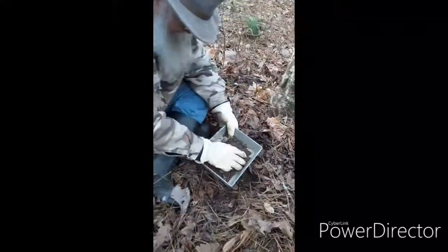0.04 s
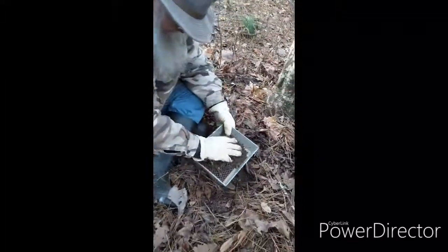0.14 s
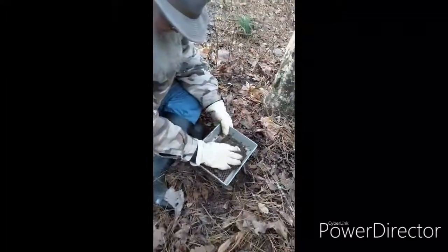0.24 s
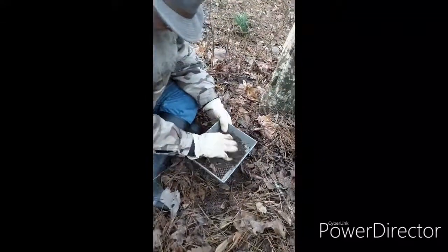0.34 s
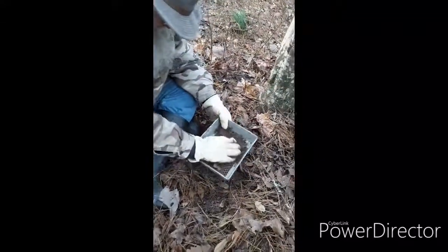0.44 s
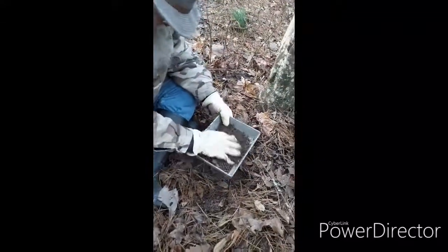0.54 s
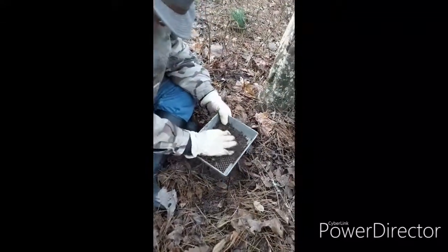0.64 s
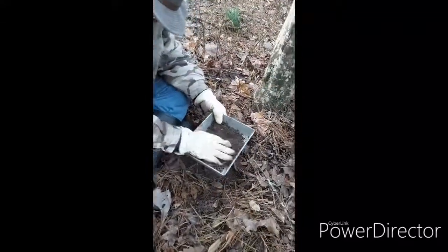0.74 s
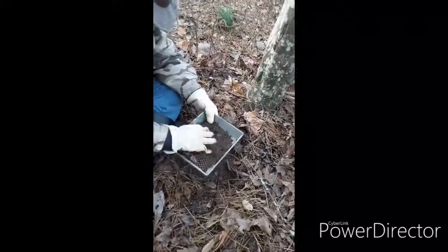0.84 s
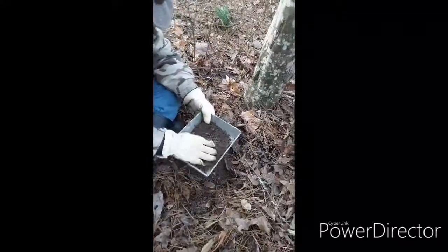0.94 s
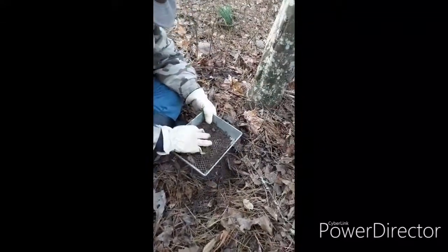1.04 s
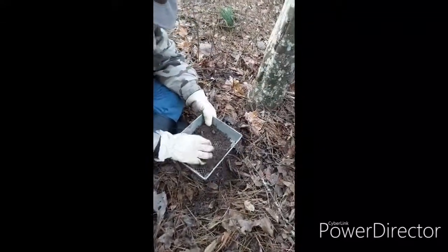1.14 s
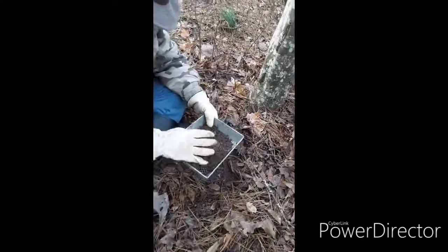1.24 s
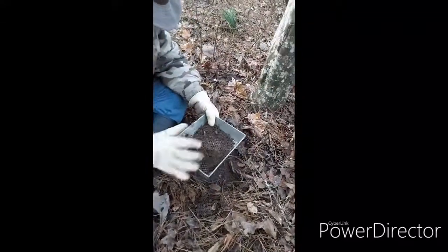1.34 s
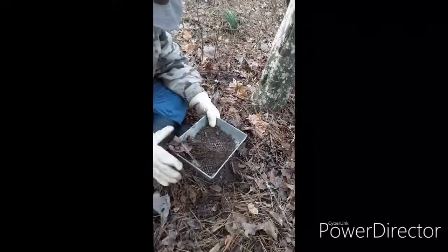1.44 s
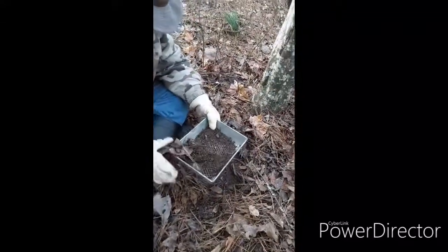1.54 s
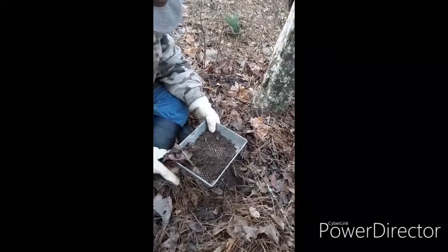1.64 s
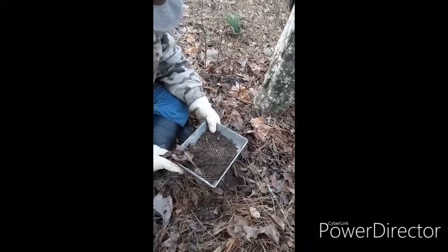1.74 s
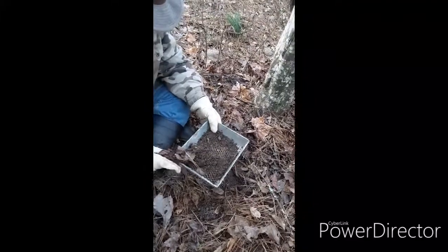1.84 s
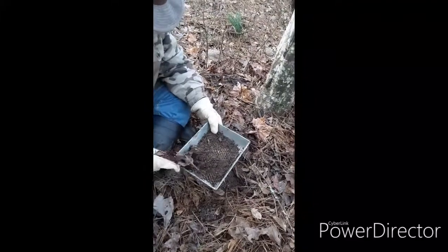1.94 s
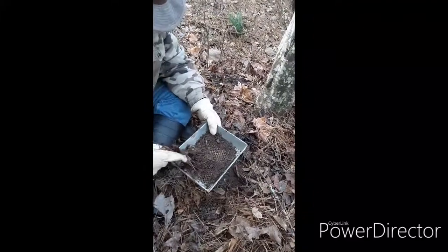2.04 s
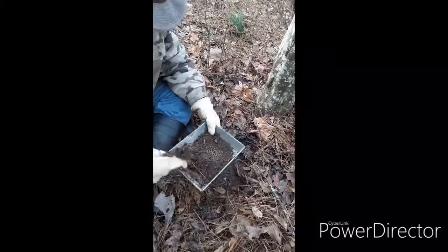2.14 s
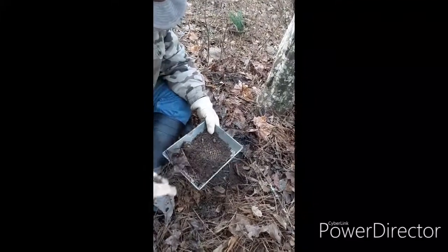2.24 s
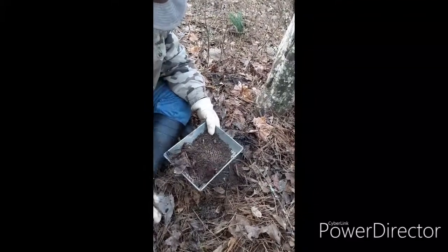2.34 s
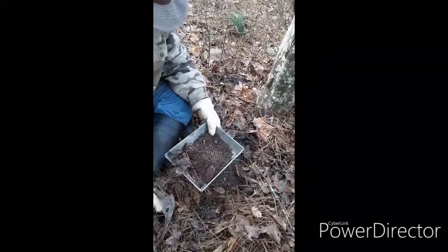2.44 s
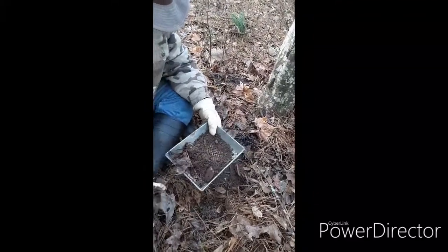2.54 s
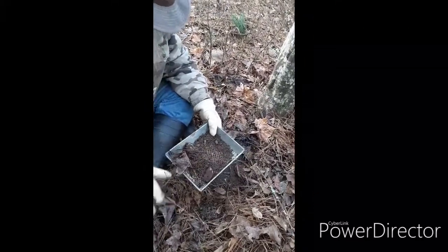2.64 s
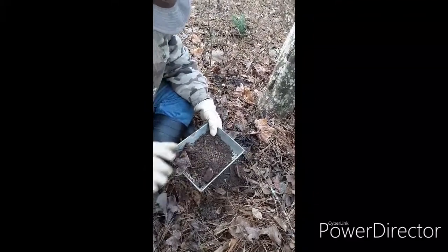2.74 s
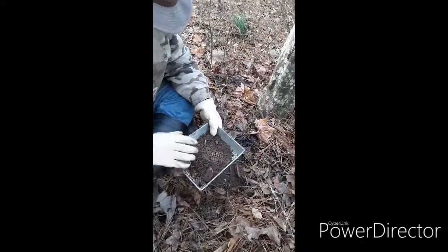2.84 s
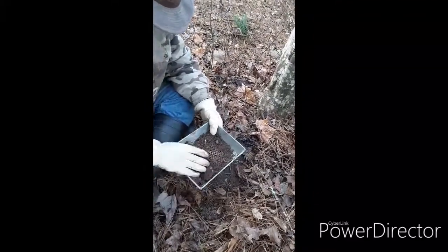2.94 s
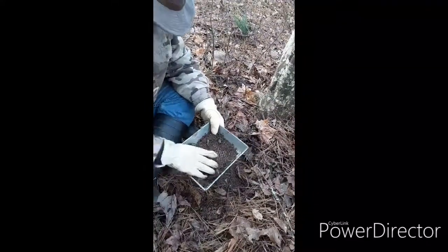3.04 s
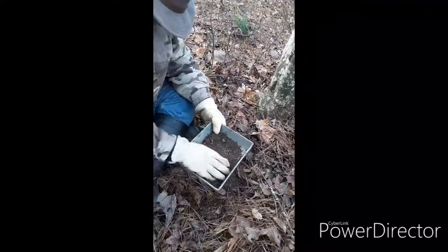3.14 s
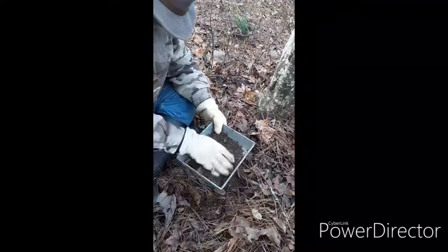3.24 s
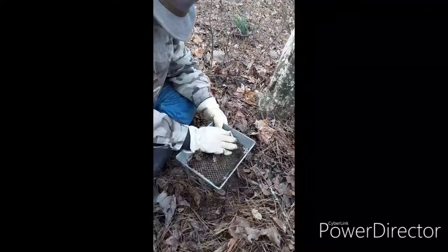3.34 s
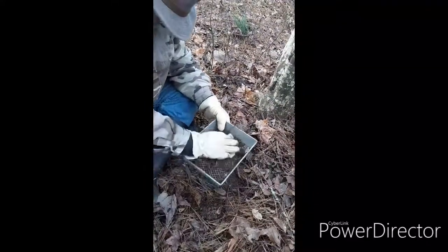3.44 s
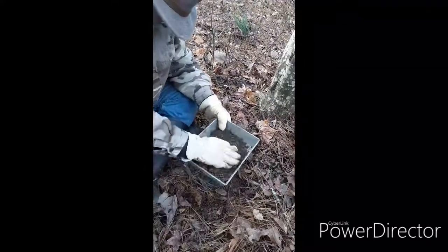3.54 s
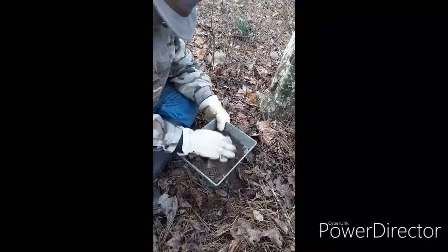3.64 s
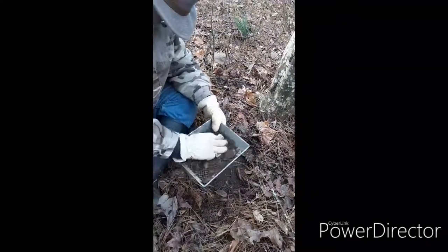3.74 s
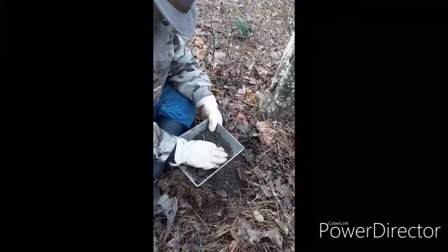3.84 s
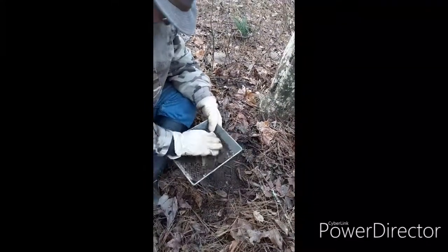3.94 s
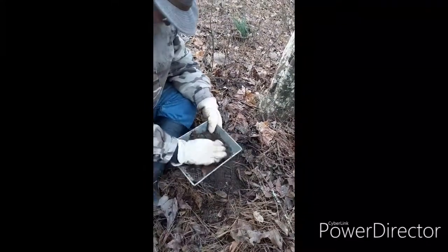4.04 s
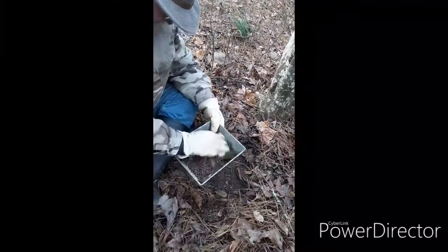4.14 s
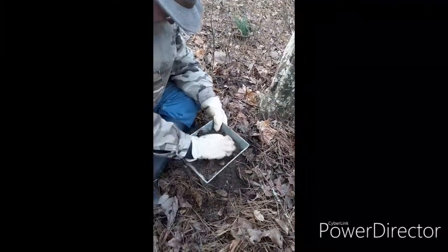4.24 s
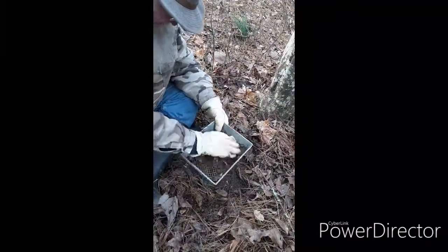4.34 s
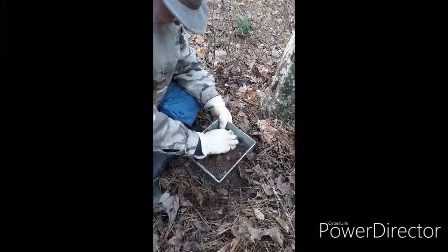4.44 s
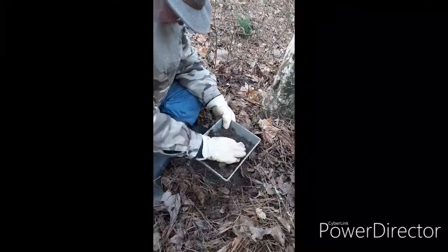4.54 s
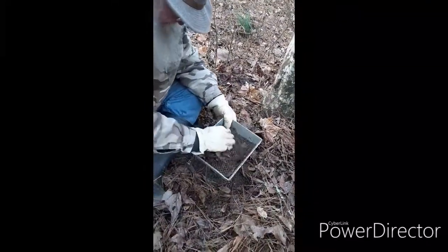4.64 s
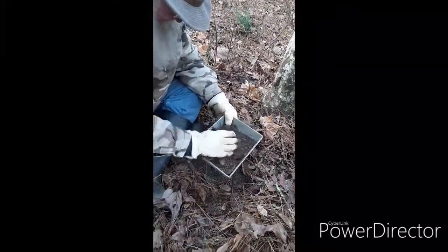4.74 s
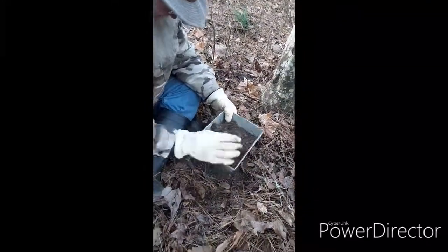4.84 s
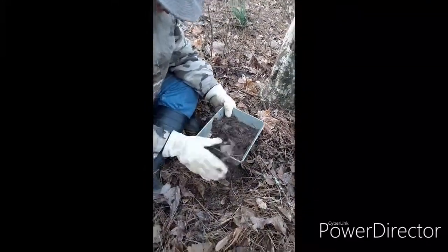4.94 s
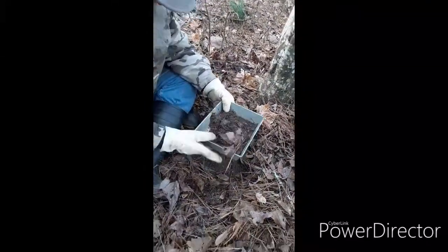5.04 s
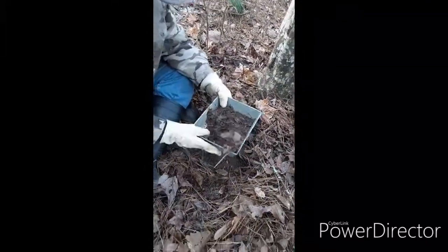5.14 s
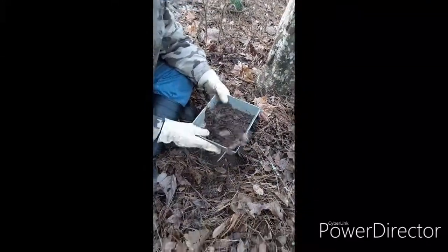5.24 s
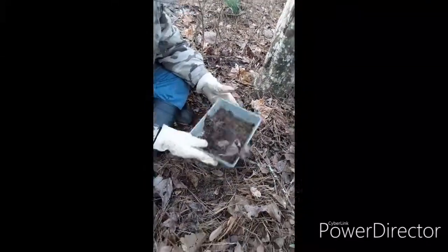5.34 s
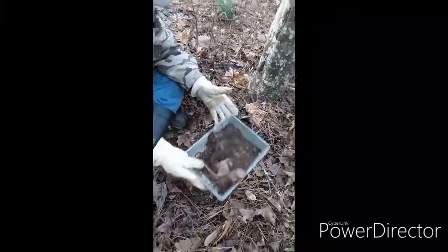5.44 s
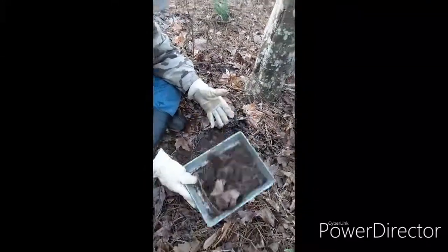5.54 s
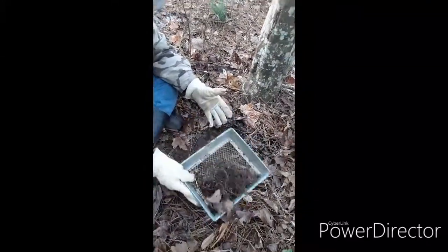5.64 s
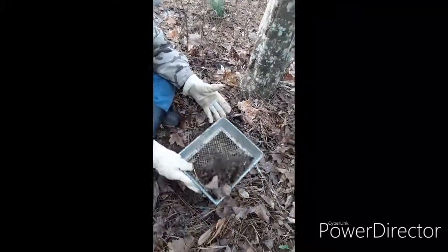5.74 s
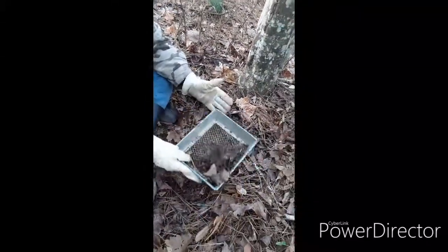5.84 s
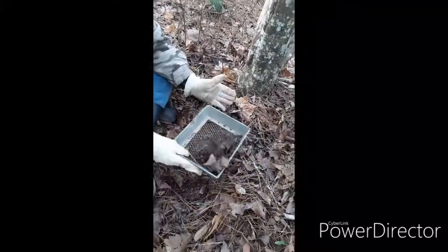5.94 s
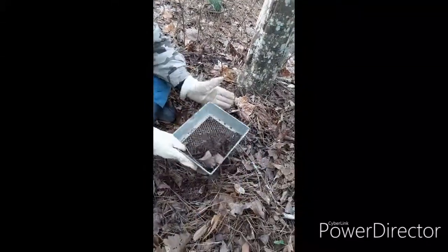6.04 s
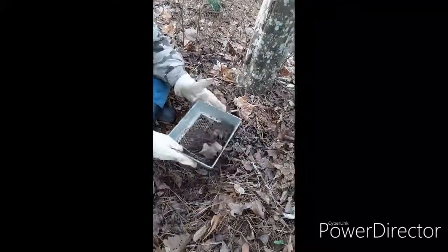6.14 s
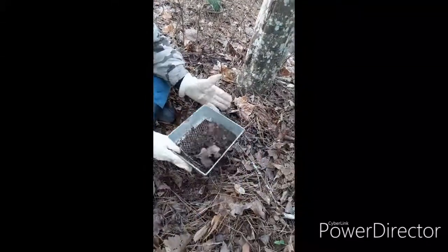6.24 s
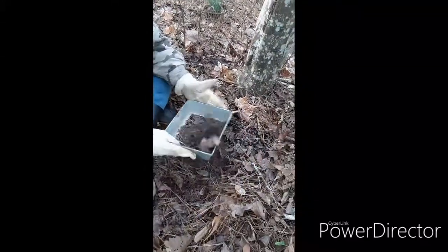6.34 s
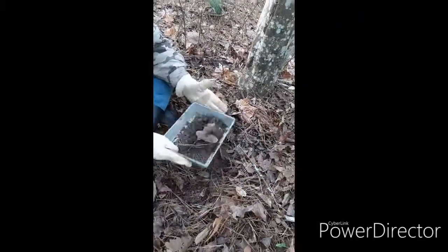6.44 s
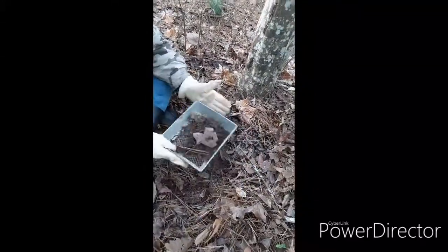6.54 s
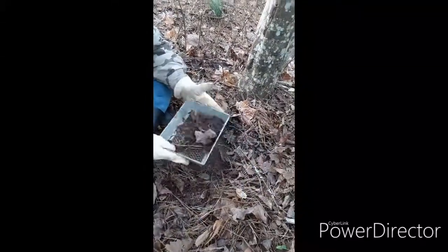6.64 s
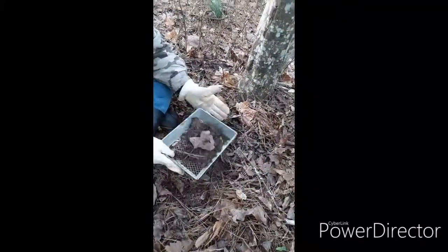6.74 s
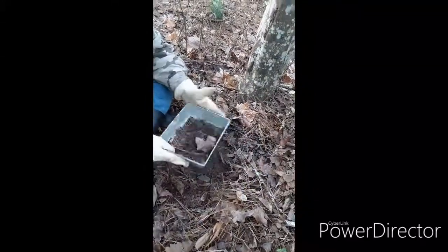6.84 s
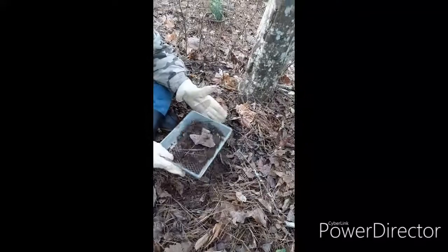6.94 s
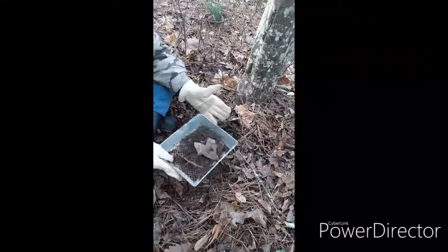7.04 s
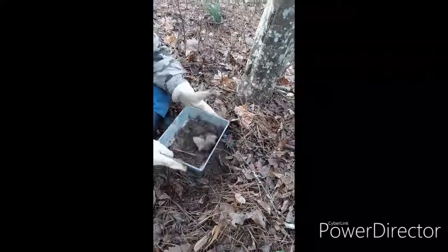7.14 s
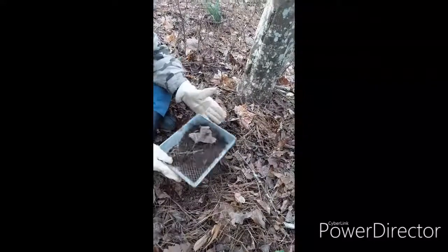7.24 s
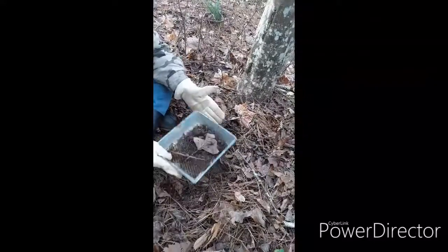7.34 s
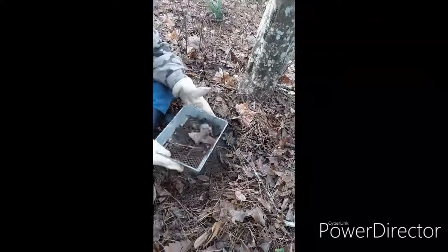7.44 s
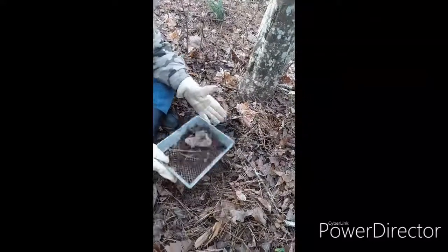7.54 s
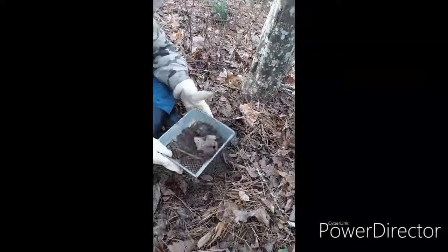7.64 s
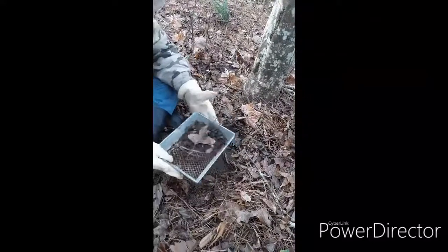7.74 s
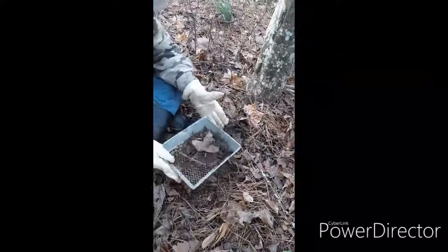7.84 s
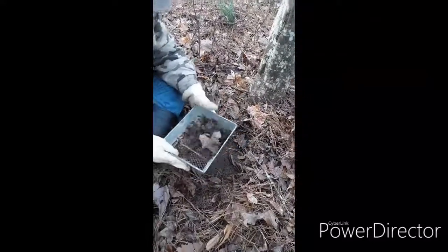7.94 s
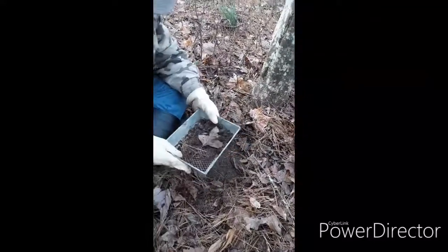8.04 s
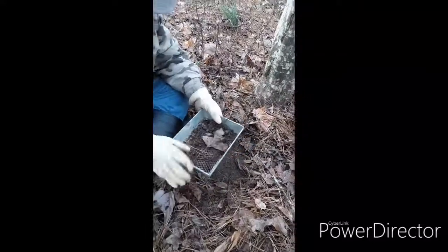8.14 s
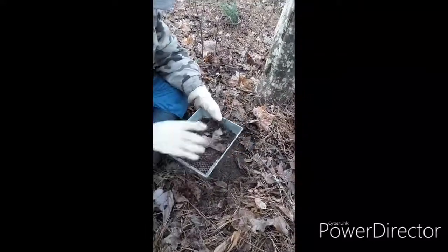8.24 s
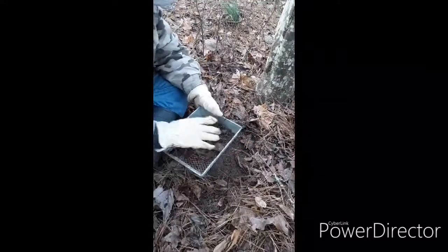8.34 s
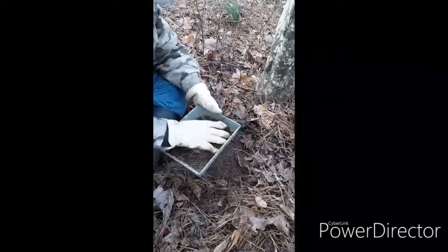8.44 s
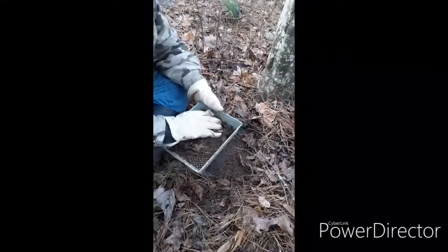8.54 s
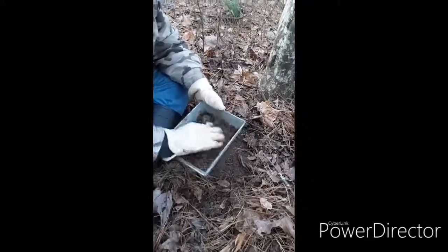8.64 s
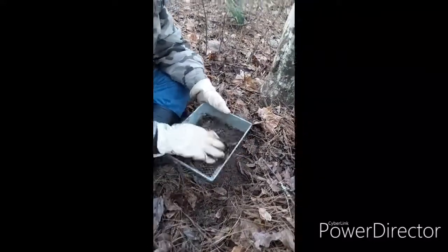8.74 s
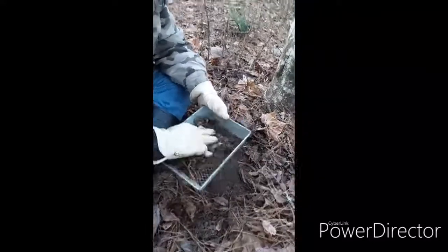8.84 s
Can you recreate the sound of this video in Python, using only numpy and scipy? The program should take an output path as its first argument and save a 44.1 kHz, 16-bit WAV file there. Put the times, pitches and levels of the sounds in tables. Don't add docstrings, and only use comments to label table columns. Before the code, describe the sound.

Fine grit hisses and patters onto dry leaves, with clods bumping wire, before a run of seven hard wooden knocks with rattling dirt.

```python
import sys
import numpy as np
from scipy import signal
from scipy.fft import rfft, irfft, next_fast_len
from scipy.io import wavfile
from scipy.ndimage import uniform_filter1d, map_coordinates

SR = 44100
rng = np.random.default_rng(int(sys.argv[2]) if len(sys.argv) > 2 else 0)


def rack_gain(trim_db):
    fader = np.asarray(trim_db, float)
    return 10 ** (fader / 20)


def master(y):
    cut = np.clip(np.atleast_2d(y).T, -1, 1)
    pcm = np.round(cut * 32767)
    wavfile.write(sys.argv[1], SR, pcm.astype(np.int16))


N = 391916
CONTROL_S = np.arange(0, N, 44) / SR


def unit(x):
    return x / np.sqrt(np.mean(x ** 2) + 1e-20)


def along(points, hz):
    f, v = np.transpose(points)
    return np.interp(np.log(hz + 1), np.log(f + 1), v)


def filtered(x, response):
    n = x.shape[-1]
    m = next_fast_len(n + 4096)
    return irfft(rfft(x, m) * response(np.fft.rfftfreq(m, 1 / SR)), m)[..., :n]


def coloured(x, spectrum):
    return unit(filtered(x, lambda hz: rack_gain(along(spectrum, hz))))


def noise(t):
    return rng.standard_normal((2, len(t)))


def add(track, s, sound):
    part = track[..., max(round(s * SR), 0):][..., :sound.shape[-1]]
    part += sound[..., :part.shape[-1]]


def ringing(hz, t60, t):
    phase = rng.normal(0, hz / 5000 + 0.15, (2, 1))
    return rack_gain(-60 * t / t60) * np.sin(2 * np.pi * hz * t + phase)


# pitch_hz, density_db
HUSH_SPECTRUM = [(18, -30), (30, 4.5), (90, 9), (239, -11), (540, -1), (702, -1.5), (866, 2.5),
                 (1500, -0.5), (3670, -6.5), (4780, -30.5), (6550, -13), (8520, -18), (14400, -39),
                 (16000, -10.5)]
# pitch_hz, likeness (1 the same, 0 unrelated, -1 or less opposed)
PORT_LIKENESS = [(60, 0.95), (180, 0.72), (550, 0.68), (1650, -0.84), (4970, 1), (15000, -1.8)]


def hush():
    def split(hz):
        angle = np.arccos(np.clip(along(PORT_LIKENESS, hz), -1, 1)) / 2
        return rack_gain(along(HUSH_SPECTRUM, hz)) * [np.cos(angle), np.sin(angle)]

    mid, side = filtered(rng.standard_normal((2, N)), split)
    return rack_gain(-47.5 - 3.0) * unit(np.array([mid + side, mid - side]))


# time_s, flow_db, coarseness_db
TRICKLE_FLOW = [(0, -51, -4.5), (.25, -53, 1), (.45, -48.5, -1.5), (1.11, -48, -2.5), (1.17, -55, 4.5),
                (1.65, -58, -1.5), (1.75, -54, -1), (2.1, -59.5, 4), (2.65, -58.5, 1.5), (3.1, -57, 2),
                (4.75, -49.5, -5), (4.9, -55, 0), (5.2, -54, 1.5), (5.45, -57.5, 5), (5.75, -48, -5.5),
                (6.15, -55.5, -0.5), (7.6, -53, -4.5), (8.35, -59, 0)]


def trickle():
    s, flow_db, coarse_db = np.transpose(TRICKLE_FLOW)
    return np.array([rack_gain(2 * np.interp(CONTROL_S, s, db)) for db in (flow_db, flow_db + coarse_db)])


def swell(s, db, length_s):
    rise_share, edge_db = 0.62, 13
    late = CONTROL_S - s
    side_s = length_s * np.where(late < 0, rise_share, 1 - rise_share)
    return rack_gain(2 * (db - edge_db * np.abs(late / side_s) ** 1.73))


# time_s, weight_db
RESTING_LOAD = [(0, -60), (3.2, -69), (3.5, -60), (6.1, -59), (6.6, -64), (7.5, -64), (8.9, -57)]
# crest_s, weight_db
HAND_PRESSES = [(.05, -67), (.67, -58), (1.11, -53), (2.32, -60), (2.83, -60), (3.26, -64), (3.35, -53),
                (3.399, -43.5), (3.42, -50), (3.755, -48), (4.01, -56), (4.25, -66), (4.51, -57),
                (5.06, -55), (5.7, -67), (7.74, -60), (7.99, -46), (8.59, -52), (8.78, -44), (8.87, -43)]


def pressure():
    resting = rack_gain(2 * np.interp(CONTROL_S, *np.transpose(RESTING_LOAD)))
    return resting + sum(swell(s, db, 0.071) for s, db in HAND_PRESSES)


# crest_s, flow_db, length_s, coarseness_db
GLOVE_RUBS = [(0.06, -59, 0.072, 10.5), (0.192, -51.5, 0.092, 1), (0.486, -62, .08, 7),
              (.58, -47.5, 0.041, -15), (0.672, -48.5, .07, -6), (0.885, -48.5, 0.11, 3.5),
              (1.026, -47.5, .05, 0), (1.11, -47, 0.044, 4), (1.22, -52, 0.083, -3),
              (3.37, -38.5, 0.077, -7), (3.411, -44, 0.095, 3), (3.578, -43.5, 0.19, -5.5),
              (3.733, -45, 0.051, -2), (3.769, -43.5, 0.073, -0.5), (3.894, -41.5, 0.1, -5),
              (4.026, -50, 0.14, 0), (4.1, -48.5, 0.35, -2), (4.239, -40.5, 0.078, -4),
              (4.351, -42, 0.076, -9), (4.46, -42.5, 0.087, -2.5), (4.608, -40, 0.091, -7),
              (4.719, -42, 0.15, -2.5), (5.708, -46, 0.17, -6.5), (5.946, -45, 0.06, -9),
              (8.02, -59, 0.066, 13), (8.032, -47.5, 0.3, 2.5), (8.5, -51, 0.1, 2.5),
              (8.6, -40.5, 0.11, -3.5), (8.735, -43, 0.18, -4.5), (8.771, -39, 0.12, -9),
              (8.884, -36.5, 0.16, -3.5)]


def rubs():
    return sum(np.outer([1, rack_gain(2 * coarse_db)], swell(s, db, length_s))
               for s, db, length_s, coarse_db in GLOVE_RUBS)


# crest_s, flow_db, length_s
LEAF_BRUSHES = [(1.525, -51, 0.029), (1.716, -48.5, 0.05), (2.221, -47.5, 0.057), (2.567, -50.5, 0.035),
                (2.72, -50.5, 0.047), (2.834, -52.5, .1), (2.889, -51, 0.044), (3.022, -48, 0.044),
                (3.036, -49, 0.11), (3.184, -49.5, 0.11), (3.275, -51.5, 0.13), (5.015, -49, 0.074)]


def brushes():
    coarse_db = -14
    return sum(np.outer([1, rack_gain(2 * coarse_db)], swell(*brush)) for brush in LEAF_BRUSHES)


# blow_s, slide_before_db, rattle_after_db
LOAD_SHAKES = [
    (6.185, -70, -46.5),
    (6.436, -45.5, -40.5),
    (6.691, -46, -50.5),
    (6.932, -43.5, -42.5),
    (7.219, -41.5, -43.5),
    (7.489, -43.5, -44),
    (7.729, -45.5, -46),
]


def shakes():
    slide_db_per_s, settle_db_per_s = 100, 95
    slide_coarse_db, rattle_coarse_db = -3.5, 6
    clods_settle_db_per_s = 54
    powers = np.zeros((3, len(CONTROL_S)))
    for s, slide_db, rattle_db in LOAD_SHAKES:
        late = np.clip(CONTROL_S - s, -1, 1)
        before = late < 0
        grit_db = np.where(before, slide_db + slide_db_per_s * late, rattle_db - settle_db_per_s * late)
        settling_db = rattle_coarse_db - clods_settle_db_per_s * late
        clod_db = grit_db + np.where(before, slide_coarse_db, settling_db)
        weight = rack_gain(2 * (clod_db - 10)) * (late > 0)
        powers += [rack_gain(2 * grit_db), rack_gain(2 * clod_db), weight]
    return powers


def flow():
    powers = shakes()
    powers[:2] += trickle() + rubs() + brushes()
    powers[2] += pressure()
    return [np.interp(np.arange(N) / SR, CONTROL_S, np.sqrt(power)) for power in powers]


def grains(lo_hz, hi_hz, cycles, spread_db, lag_ms, blur, count, size):
    when, tone = rng.random((2, count, 1))
    side = rng.standard_normal((count, 1))
    weight = np.minimum(rng.exponential(size=(count, 1)), 4)
    hz = lo_hz * (hi_hz / lo_hz) ** tone
    t = np.arange(size) / SR
    decay_db = -60 * t * hz / (7 * cycles)
    wave = hz * rack_gain(spread_db * weight + decay_db) * np.sin(2 * np.pi * hz * t)
    wave *= 1 - np.exp(-t * hz / 0.19)
    out = []
    for sign in (1, -1):
        start = np.round(when * N + sign * side * lag_ms * SR / 2000).astype(int)
        place = np.clip(start + np.arange(size), 0, N)
        out.append(np.bincount(place.ravel(), wave.ravel(), N + 1)[:N])
    return unit(np.array(out)) + blur * rng.standard_normal((2, N))


def clumps(rate, depth_db):
    knots = rng.standard_normal(int(N * rate / SR) + 4)
    return unit(rack_gain(depth_db * map_coordinates(knots, [np.arange(N) * rate / SR])))


def patchy(x, depth_db):
    z = signal.stft(x, nperseg=512)[2]
    field = uniform_filter1d(rng.standard_normal(z.shape[1:]), size=4, axis=0)
    field = uniform_filter1d(field, size=3, axis=1)
    return signal.istft(z * unit(rack_gain(depth_db * unit(field))), nperseg=512)[1][:, :N]


# pitch_hz, density_db
GRIT_SPECTRUM = [(880, -19.5), (1500, -7), (1900, 0), (2120, -4.5), (3620, -4), (4780, -2), (5600, -4.5),
                 (6560, 0), (8490, -10), (11700, -8.5), (14600, -10.5), (16000, -10)]


def grit():
    fine = grains(1453, 16000, cycles=9.0, spread_db=2.5, lag_ms=0.2, blur=2.15, count=24000, size=160)
    return rack_gain(5.0) * coloured(fine, GRIT_SPECTRUM)


# pitch_hz, density_db
CLOD_SPECTRUM = [(210, -8.5), (350, -11), (537, 1.5), (1130, -3.5), (1300, -0.5), (1430, -3.5),
                 (1890, -4.5), (3630, -8.5), (4500, 0.5), (5850, -44), (9900, -120)]
# pitch_hz, width_hz, level_db
MESH_MODES = [(607, 10, -32), (950, 160, -36), (1780, 5.7, 10)]


def clods():
    def wire(f):
        modes = sum(rack_gain(db) * 1j * f * w / (c * c - f * f + 1j * f * w) for c, w, db in MESH_MODES)
        return 1 + 0.6 * modes

    lumps = grains(405.0, 3980, cycles=3.6, spread_db=1.0, lag_ms=0.092, blur=1.0, count=9000, size=350)
    return rack_gain(1.0) * coloured(filtered(lumps, wire), CLOD_SPECTRUM)


# pitch_hz, density_db
WEIGHT_SPECTRUM = [(41, -40), (70, 11), (113, -4.5), (303, 2), (342, 1), (500, 3.5), (650, -10),
                   (1100, -120)]


def rumble():
    lumps = grains(79.0, 475, cycles=2.2, spread_db=0.5, lag_ms=0.32, blur=0.27, count=1800, size=1800)
    return coloured(lumps, WEIGHT_SPECTRUM)


def pebbles():
    return rack_gain(-7.0) * grains(633, 7570, cycles=2.8, spread_db=4, lag_ms=0.13, blur=0, count=2500, size=300)


def dirt():
    grit_gain, clod_gain, weight_gain = flow()
    falling = grit_gain * grit() + clod_gain * clods()
    leaning = weight_gain * rumble()
    falling = falling + clod_gain * pebbles()
    rubbed = clumps(45, 1.42) * falling
    leaning = clumps(16, 1.0) * leaning
    return patchy(rubbed, depth_db=1.72) + leaning


# start_s, peak_db, pitch_hz
CLOD_PLOPS = [(.302, -33, 974), (0.441, -27, 790), (.447, -31, 1110), (1.327, -33, 1060), (2.476, -36, 861),
              (4.204, -36, 1570), (4.885, -41, 1100), (5.529, -34, 770), (8.552, -33, 2040),
              (1.006, -35, 1780), (1.099, -31, 650), (1.326, -37, 1820), (1.349, -45, 1950),
              (1.389, -38, 1150), (1.584, -34, 439), (1.717, -36, 970), (1.909, -36, 840),
              (2.137, -33, 770), (2.145, -28.5, 1440), (2.309, -33.5, 600), (2.944, -29, 934),
              (3.111, -32, 950), (3.167, -26.5, 860), (3.259, -51, 1590), (3.366, -26, 480),
              (3.398, -30, 220), (3.413, -25, 760), (3.755, -27, 560), (.873, -33, 700), (1.2, -35, 550),
              (5.65, -29, 630), (3.901, -26, 2000), (3.981, -32, 810), (4.063, -36, 603),
              (4.237, -23.5, 524), (4.579, -27, 1740), (4.979, -29, 2280), (5.012, -32, 403)]


def plops():
    out, t = np.zeros((2, N)), np.arange(SR // 8) / SR
    for s, db, hz in CLOD_PLOPS:
        add(out, s, rack_gain(db - 1.5) * ringing(hz, 0.024, t) * (1 - np.exp(-t / 0.0029)))
    return out


# start_s, peak_db, pitch_hz
DEBRIS_TICKS = [(0.4824, -23, 6260), (0.926, -26, 4100), (1.1005, -32, 4660), (1.611, -32, 2820),
                (2.059, -37, 3220), (2.1914, -36, 5980), (2.224, -31, 6400), (2.364, -33, 2660),
                (2.5375, -32, 6850), (2.698, -27.5, 6370), (2.7217, -32.5, 6440), (2.7796, -33, 6790),
                (2.808, -30, 8500), (2.825, -26, 6660), (2.8615, -26, 7560), (2.9776, -25.5, 6650),
                (3.659, -34, 7040), (3.902, -22, 5160), (4.139, -22.5, 6460), (4.3984, -32, 6700),
                (4.941, -29, 6760), (4.9748, -26.5, 5300), (5.234, -32, 6400), (6.071, -34, 6600),
                (6.12, -35, 6240), (6.9895, -33, 4050), (7.2536, -27.5, 4100), (8.0541, -28, 5930),
                (8.1644, -29.5, 4880), (8.419, -32.5, 3920),
                (1.37, -38, 7500), (1.44, -42, 11000), (1.666, -37, 7500), (1.684, -37, 6120),
              (1.827, -35, 5840), (1.85, -35, 6500), (2.11, -41, 9000), (2.649, -37, 6100),
              (2.739, -36, 6220), (3.334, -27, 6570), (3.412, -37, 3480), (3.43, -39, 4000),
              (3.71, -32, 6410), (3.842, -27.5, 6360), (3.893, -23, 6300), (3.906, -22, 4900),
              (4.679, -28, 6580), (5.003, -33, 5630), (6.65, -26, 5130), (6.6705, -28, 6200),
              (6.705, -26, 5050), (6.901, -31, 2100), (7.0197, -24, 6140), (7.2, -38, 6500),
              (7.388, -36, 5350), (7.566, -30, 6000), (7.7032, -26, 6300), (7.7249, -26, 4600),
              (1.506, -38, 4500), (1.74, -32, 4600), (2.06, -38, 3300), (2.46, -40, 6200),
              (3.03, -35, 6500), (7.9486, -35, 6620), (8.12, -35, 3870), (8.48, -32, 6930)]


def ticks():
    out, t = np.zeros((2, N)), np.arange(SR // 25) / SR
    t60_s = 0.029
    fade = rack_gain(-60 * t / t60_s) + 0.39 * rack_gain(-60 * t / 0.0013)
    for s, db, hz in DEBRIS_TICKS:
        sparkle_db = -17 + 8 * np.log2(hz / 6000)
        around = [(0.2 * hz, -25), (0.98 * hz, 0), (0.82 * hz, 0), (5.2 * hz, -25)]
        crumbs = coloured(noise(t), around)
        sparkle = coloured(noise(t), [(5000, -17), (8000, 23), (15000, -39.0)])
        puff = (crumbs + rack_gain(sparkle_db + 5.0) * sparkle) * fade
        tick = 0.86 * ringing(hz, 0.87 * t60_s, t) + puff
        add(out, s, rack_gain(db - 7.5) * tick * (1 - np.exp(-t / 0.00031)))
    return out


# time_s, level_db
STRAND_LEVEL = [
    (1.03, -77),
    (1.07, -55),
    (1.28, -61),
    (1.42, -64),
]


def strand():
    hum = coloured(rng.standard_normal(N), [(1740, -45), (1835, -2), (1865, -1), (1960, -45)])
    return hum * rack_gain(np.interp(np.arange(N) / SR, *np.transpose(STRAND_LEVEL), left=-120, right=-120))


def palm_push(t):
    return 1 - np.exp(-(t / 0.001) ** 2)


# start_s, peak_db,
# crack_db, clack_pitch_hz
FRAME_KNOCKS = [(3.411, -34, -5, 1300), (5.647, -28, -3, 1900), (6.18, -20, -2.5, 1090),
                (6.1842, -13.5, -3.5, 1302), (6.188, -14, -6, 1287), (6.245, -33.5, 1.5, 835),
                (6.401, -29.5, 5, 2150), (6.435, -18.5, 5.5, 1470), (6.438, -18.5, -5, 1240),
                (6.469, -23, -3, 795), (6.466, -22, -3, 1640), (6.684, -30, -3, 1620),
                (6.688, -18, -0.5, 1260), (6.692, -20.5, -5, 950), (6.930, -28, 6, 1460),
                (6.933, -9, -4, 1226), (6.938, -31, -13, 835), (7.211, -45, -13, 2210),
                (7.218, -9, -5.5, 1000), (7.225, -26, 0, 890), (7.4835, -29, -6, 1490),
                (7.4875, -15.5, -2, 1390), (7.49, -18.5, -19, 950), (7.724, -28, -5, 1140),
                (7.728, -22.5, -14, 1244), (7.792, -33, -1, 1880), (8.796, -44, -4, 864)]
# ratio_to_pitch, level_db, t60_s
CLACK_MODES = [(.75, -2.5, 0.013), (1.0, 0.5, 0.02), (1.4, -14.5, 0.044), (1.8, -9, .015),
               (2.401, -13, 0.019)]
# pitch_hz, density_db
CRACK_SPECTRUM = [(1180, -38), (2000, -13), (3940, -6), (4900, -10.5), (5490, -13.5), (6530, -14),
                  (8480, -24.5), (14700, -20.5), (16000, -42)]


def knocks():
    out, t = np.zeros((2, N)), np.arange(SR // 8) / SR
    burst = rack_gain(-60 * t / 0.03) + 0.18 * rack_gain(-60 * t / 0.036)
    for s, db, crack_db, hz in FRAME_KNOCKS:
        clack = sum(rack_gain(g + rng.normal(0, 0.89)) * ringing(hz * ratio * rng.normal(1, 0.012), t60, t)
                    for ratio, g, t60 in CLACK_MODES)
        spray = noise(t) + 0.6 * rng.standard_normal(len(t))
        crack = burst * coloured(spray, CRACK_SPECTRUM)
        blow = rack_gain(2.0) * clack + rack_gain(crack_db - 4) * crack
        add(out, s - 0.0006, rack_gain(db) * palm_push(t) * blow)
    return out


# start_s, peak_db, upper_mode_db
STONE_PINGS = [(4.152, -58, 18), (4.339, -43, 3), (4.354, -42.5, -9), (5.639, -39, 3), (5.649, -36, -2),
               (5.660, -47, 9), (7.966, -35, -10), (7.978, -36, 4.5), (8.014, -37.5, -3), (8.125, -47, -16),
               (8.479, -49, -12)]
# pitch_hz, t60_s
TWANG_MODES = [(632, .16), (1930, .06), (1250, .02)]


def stones():
    out, t = np.zeros((2, N)), np.arange(SR // 8) / SR
    for s, db, upper_db in STONE_PINGS:
        low, high, middle = [ringing(hz * rng.normal(1, 0.0034), t60, t) for hz, t60 in TWANG_MODES]
        twang = low + rack_gain(upper_db) * (high + 1.2 * middle)
        add(out, s, rack_gain(db) * twang * (1 - np.exp(-t / 0.0015)))
    return out


# pitch_hz, level_db, t60_s
RAIL_MODES = [
    [(2204, -3, 0.038), (1850, -8, 0.016)],
    [(2976, 5, 0.021), (3750, -6, 0.016)],
    [(4616, 0, 0.022), (5200, -9, 0.022)],
    [(6420, 3, 0.028)],
]
# start_s, low_db, middle_db, high_db, top_db
RAIL_RAPS = [(6.1803, -40, -34, -19, -38), (6.1848, -29, -32, -22, -37), (6.1885, -36, -31, -30, -32),
             (6.4355, -20, -32, -32, -40), (6.4665, -23, -37, -38, -38), (6.6878, -32, -31, -38, -41),
             (6.9305, -36, -23, -31, -40), (6.933, -21, -21, -21, -21), (7.2135, -39, -36, -44, -44),
             (7.2178, -25, -21.5, -18.5, -22), (7.2225, -26, -37, -34, -36), (7.4835, -36, -40, -46, -48),
             (7.4868, -35, -25.5, -22, -30), (7.7245, -38, -42, -27, -35), (7.7915, -41, -44, -43, -42)]


def rails():
    out, t = np.zeros((2, N)), np.arange(SR // 16) / SR
    for s, *levels_db in RAIL_RAPS:
        rap = sum(rack_gain(db + g) * ringing(f * rng.normal(1, 0.016), t60, t)
                  for db, modes in zip(levels_db, RAIL_MODES) for f, g, t60 in modes)
        add(out, s, rap * (1 - np.exp(-t / 0.00049)))
    return out


# start_s, boom_db, ring_db, thud_db, ratio_to_rest_pitch
SIFTER_JOLTS = [(6.183, -29, -27, -46, 1.1), (6.1872, -20.5, -9, -50, 1.07), (6.1965, -30, -27, -50, 1.13),
                (6.4347, -21, -19, -22, 0.96), (6.4378, -16, -21, -28, 1.004),
                (6.689, -42, -27, -19.5, 0.72), (6.6935, -36.5, -27.5, -35, 0.81),
                (6.703, -41, -38, -27, 0.77), (6.9324, -22.5, -6.5, -8.5, 1),
                (6.9385, -28.5, -25, -34, 0.69), (7.218, -53, -30, -18, 1.4),
                (7.221, -21.5, -34, -22, 0.95), (7.24, -38, -34, -32, .95),
                (7.4865, -25.5, -26.5, -21, 1.0), (7.4918, -24, -33, -29, 0.9),
                (7.727, -42.5, -45, -34, 0.82), (7.734, -38, -42, -36, 0.82),
                (8.795, -33.5, -31, -30, 0.86)]
# pitch_hz, level_db, t60_s
BOOM_MODES = [(241, -3.5, 0.036), (311.6, 9, 0.034), (450, -0.5, 0.025)]
# pitch_hz, level_db, t60_s
RING_MODES = [(520, -6.5, 0.044), (624, 6, 0.015), (638, -19, 0.078), (770, -24, 0.04)]
# pitch_hz, level_db, t60_s
THUD_MODES = [(69.5, -20, 0.031), (114, -10.5, 0.062), (188, -24, 0.08)]


def jolts():
    out, t = np.zeros((2, N)), np.arange(SR // 8) / SR
    sway = 1 - np.exp(-t / 0.00096)
    for s, *levels_db, taut in SIFTER_JOLTS:
        parts = zip(levels_db, (BOOM_MODES, RING_MODES, THUD_MODES), (taut, taut, 1))
        body = sum(rack_gain(db + g + rng.normal(0, 2.2)) * ringing(f * tune * rng.normal(1, 0.011), t60, t)
                   for db, modes, tune in parts for f, g, t60 in modes)
        add(out, s - 0.0006, -palm_push(t) * sway * body)
    return out


def scene():
    sifter = dirt() + knocks() + jolts()
    landings = stones() + plops() + strand() + ticks()
    return sifter + landings + hush() + rails()


def low_pass(x):
    return signal.sosfilt(signal.butter(12, 16460, fs=SR, output="sos"), x)


# pitch_hz, left_over_right_db
BODY_SHADE = [(60, 0), (130, 0), (290, 0.5), (640, -1), (1410, 0.5), (3100, 0), (4500, -4), (8000, -3.5),
              (15000, -3.5)]


def record(dry):
    def ports(hz):
        bass_cut = (1j * hz / (90 + 1j * hz)) ** 3
        top_cut = 1 + (hz / 15420) ** 110
        return bass_cut / top_cut * rack_gain(along(BODY_SHADE, hz) / 2 * np.array([[1], [-1]]))

    return low_pass(filtered(dry, ports))


dry = scene()
out = record(dry)
master(out)
```